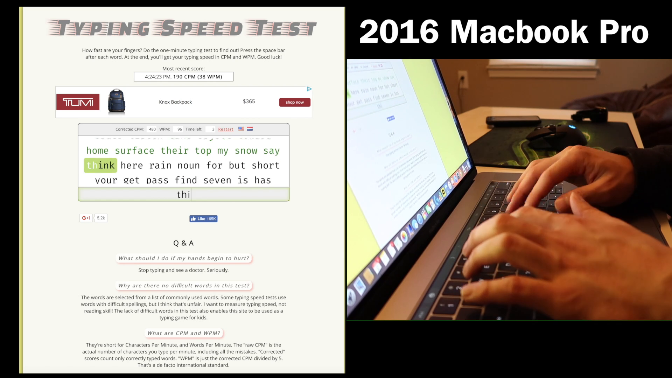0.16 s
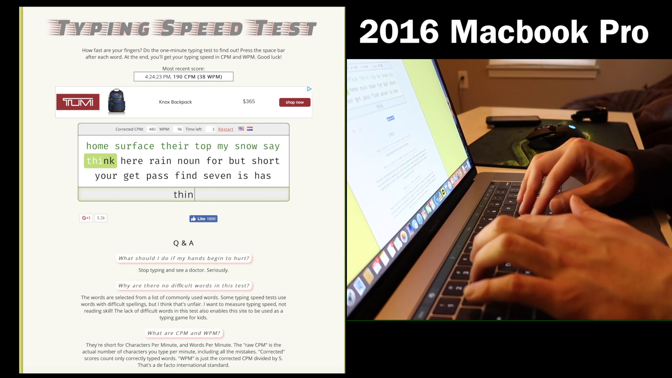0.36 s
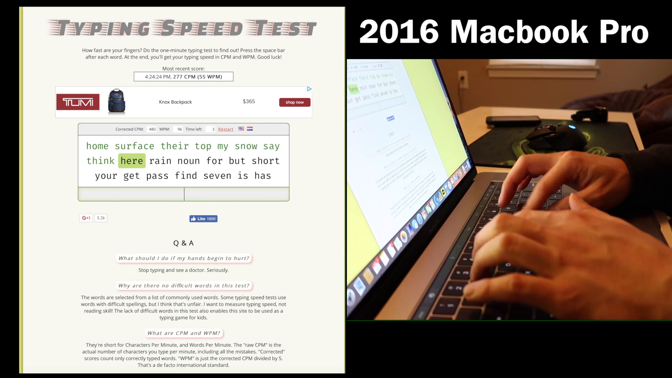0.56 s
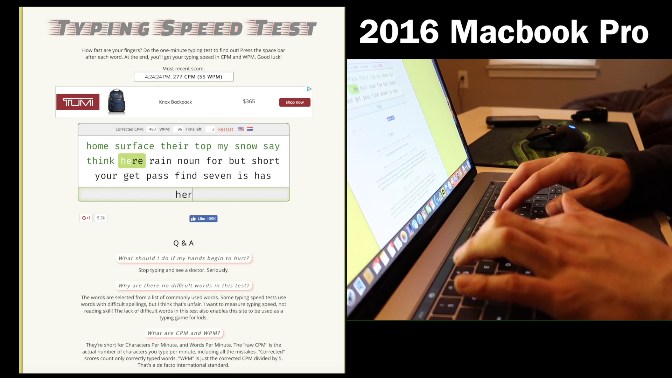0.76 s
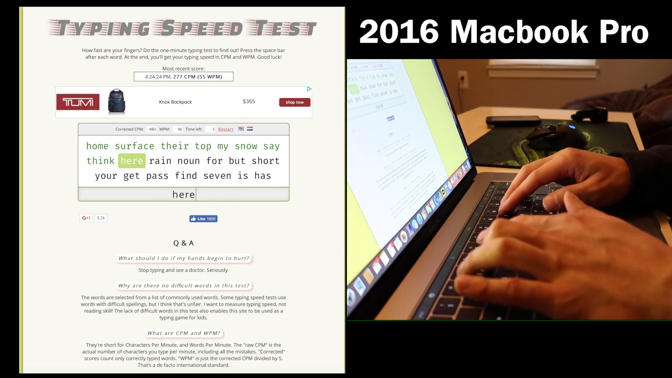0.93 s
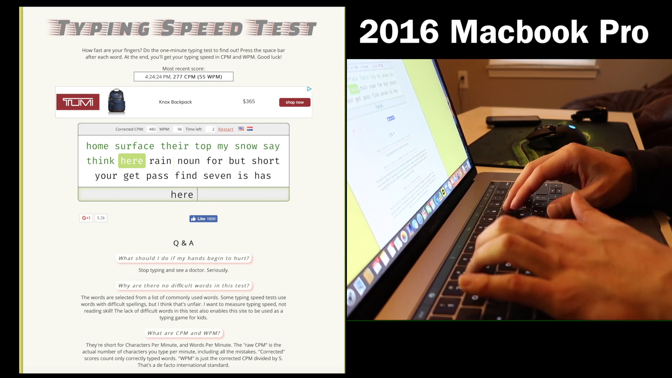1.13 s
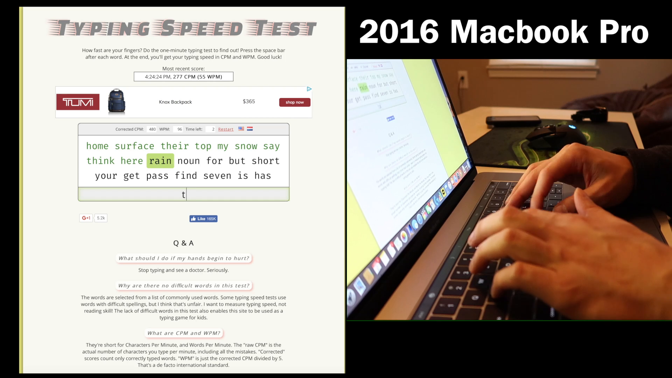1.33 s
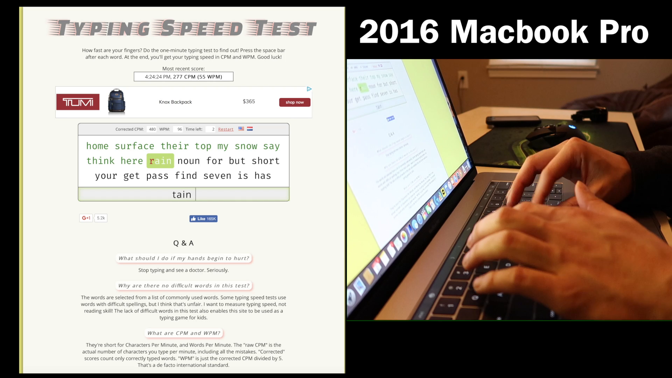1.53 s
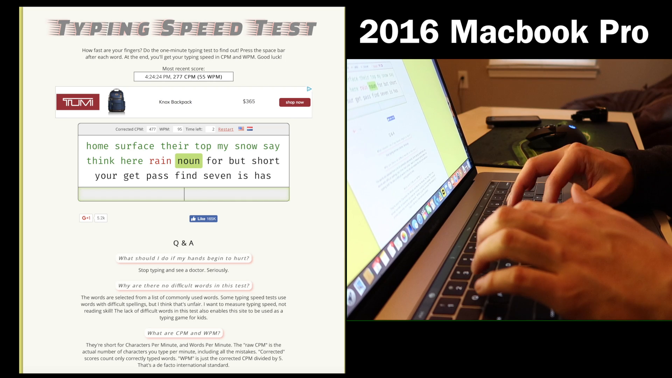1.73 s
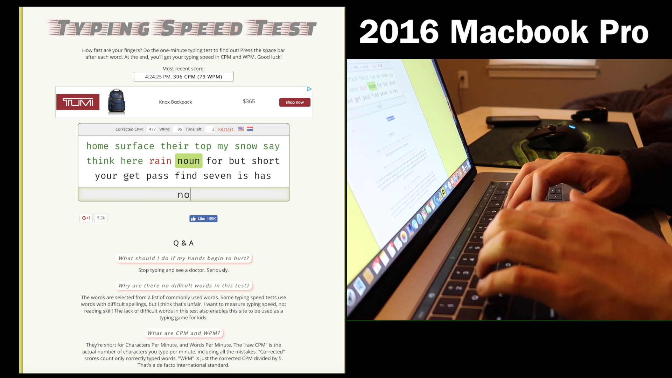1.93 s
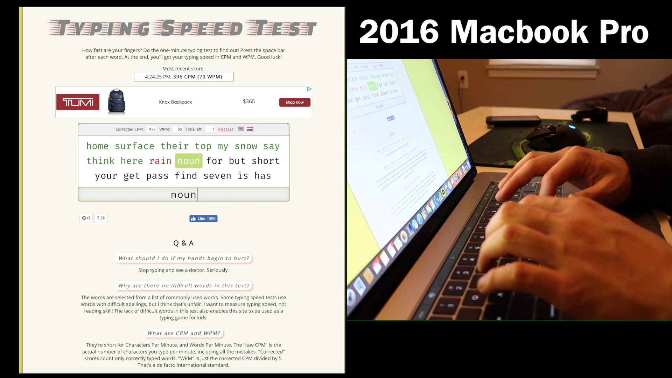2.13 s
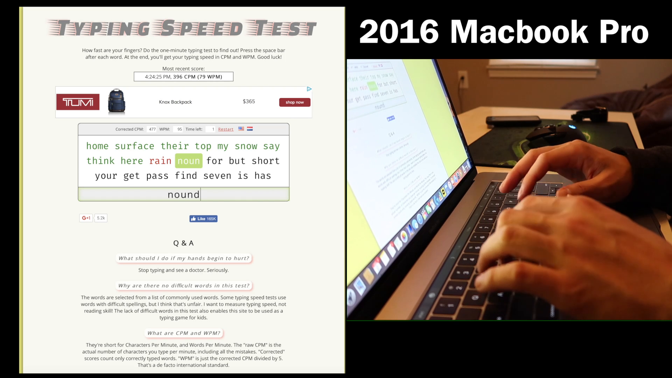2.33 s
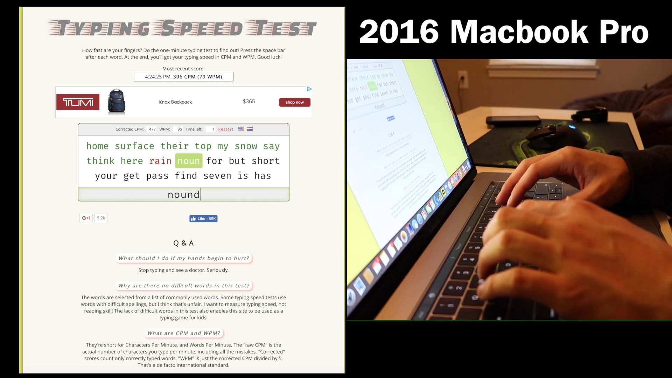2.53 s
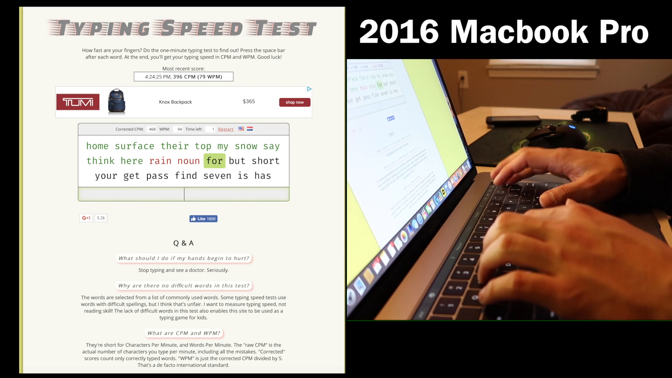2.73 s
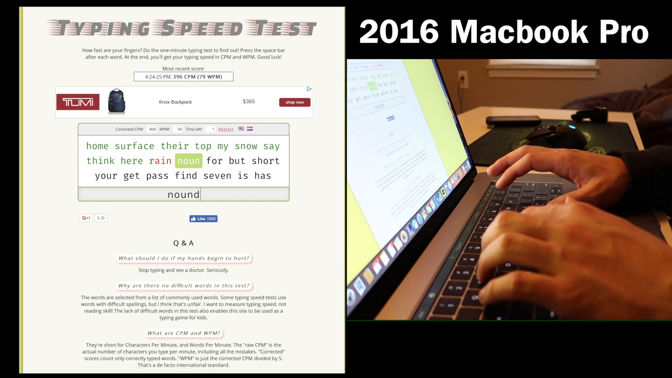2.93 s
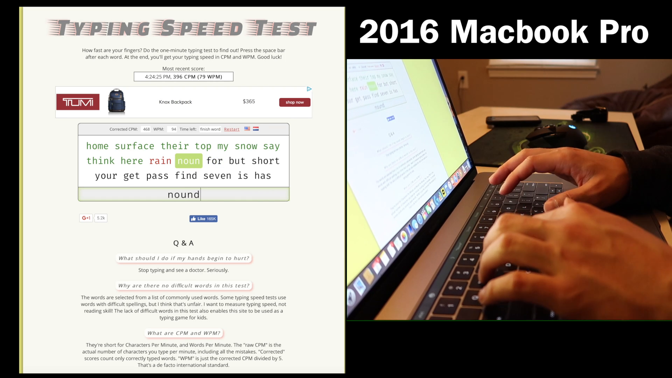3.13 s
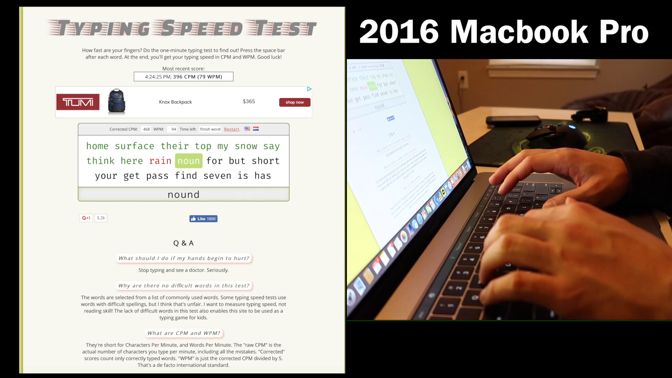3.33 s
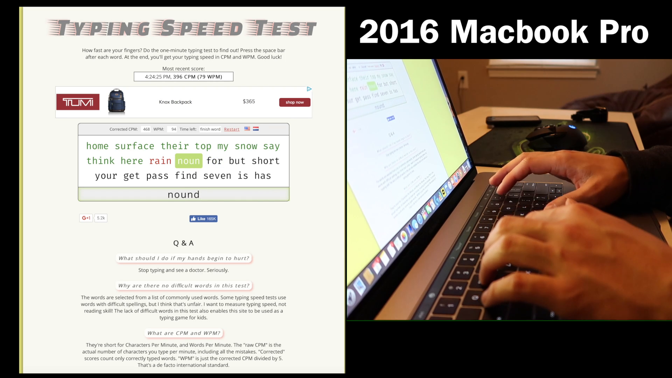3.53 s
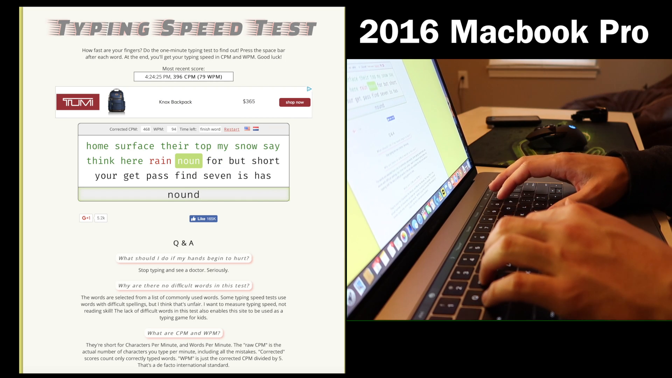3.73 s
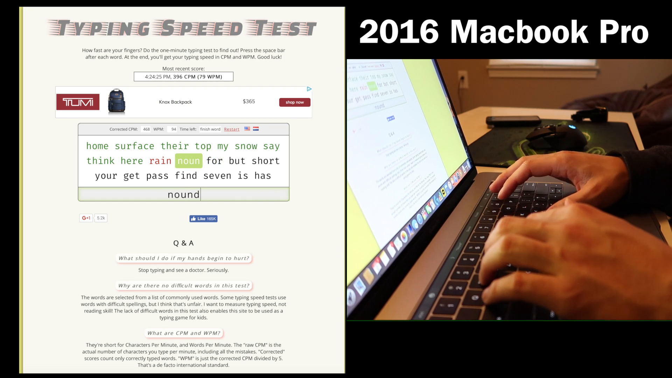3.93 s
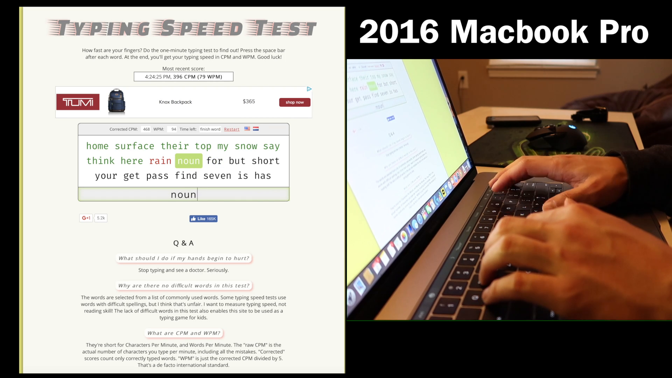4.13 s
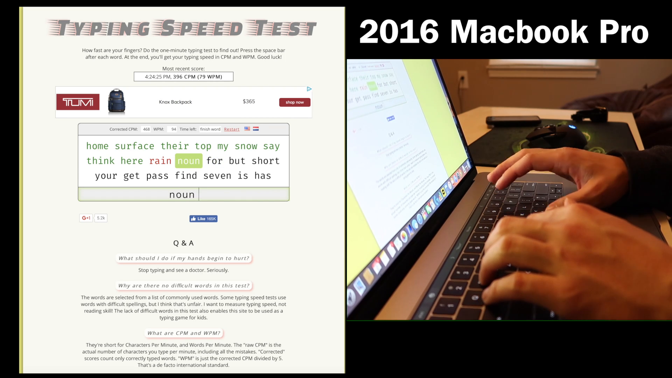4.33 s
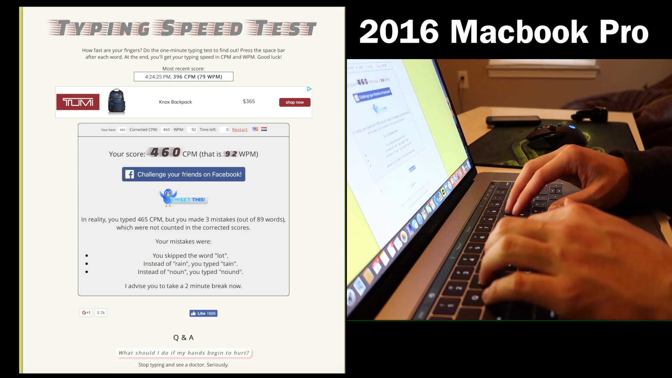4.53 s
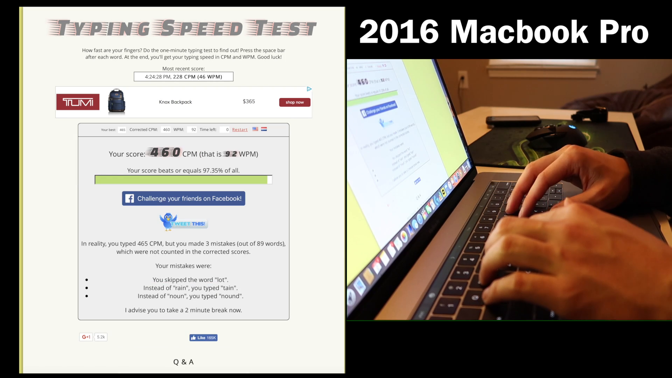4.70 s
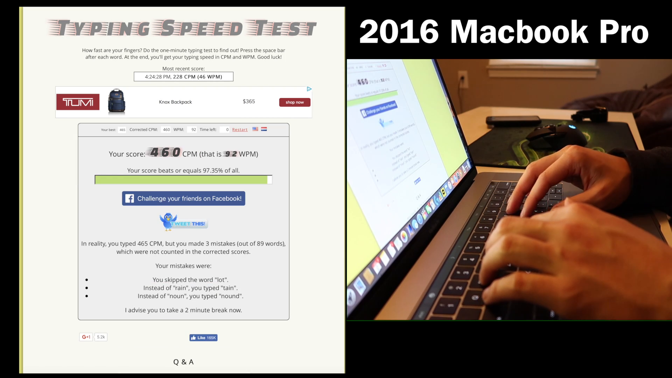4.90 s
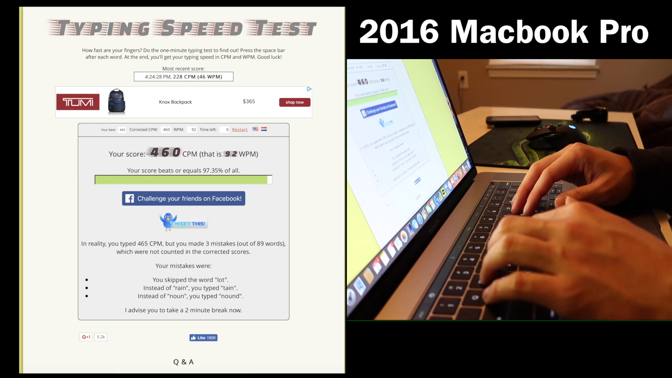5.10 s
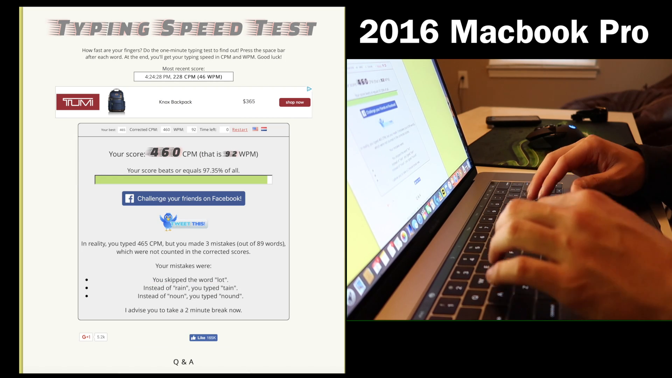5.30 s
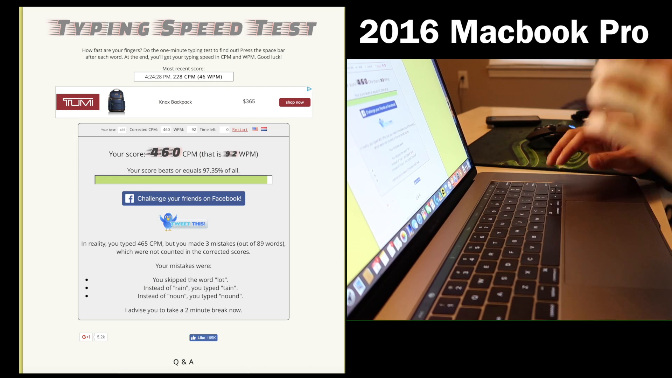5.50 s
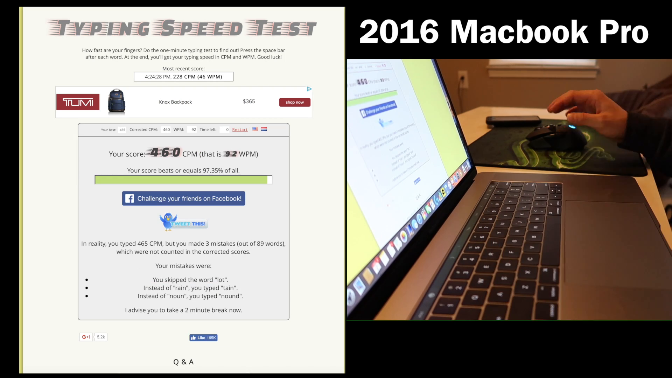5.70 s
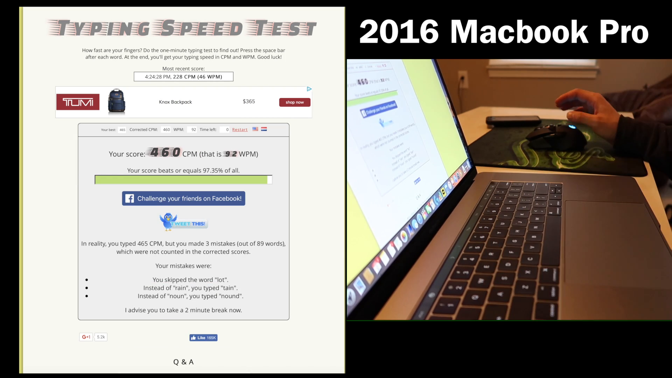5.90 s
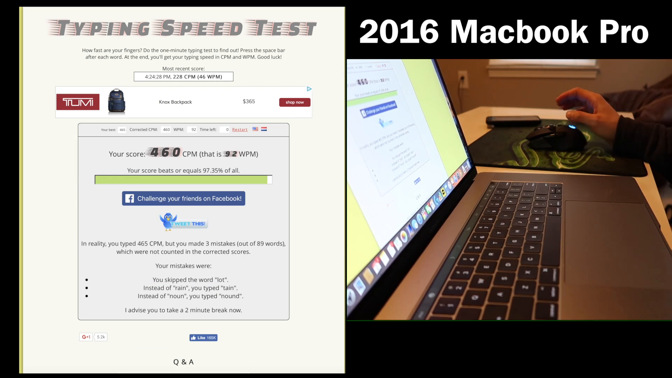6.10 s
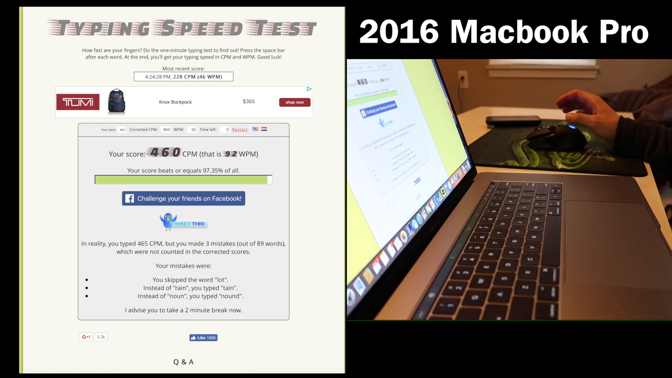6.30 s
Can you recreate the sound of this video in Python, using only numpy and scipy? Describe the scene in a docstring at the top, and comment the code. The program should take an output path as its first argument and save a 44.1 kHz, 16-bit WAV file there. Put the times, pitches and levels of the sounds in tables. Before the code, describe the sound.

From the start a thin laptop is typed on quickly and unevenly, close up in a small, fairly dry room with faint hiss and low hum. Shallow keys give crisp cracks with short metallic ringing and small thumps of case and desk, several per second, mixed with lighter taps. Wide keys clack at about 0.5, 1.1, 1.6, 2.1 and 2.7 seconds, each springing back with a duller thud about a tenth of a second later. The loudest, sharpest stroke comes near 2.4. Typing ends around 3 with tiny taps, leaving quiet background and a barely audible chirp at 3.9. Faint contacts precede one strong wide key at 4.3, released at 4.4. Very light touches follow until 4.9. From 5.2 to 5.6 a soft, grainy skin rub swells and brightens, with a gentle bump at 5.5. Faint chirps near 5.9 and a last soft tap at 6.1 close it.

```python
"""Fast typing on a thin laptop on a desk in a small room, over a faint background of hiss and hum.
Each contact cracks, rings the key plate and thumps case and desk: noise bursts drive banks of decaying modes,
and a short diffuse tail answers. After a pause come one last wide key, down and up, and some light contacts.
Then a hand slides off the palm rest to a mouse: two swelling layers of friction noise, with a soft contact
before they die away. A last soft contact follows near the end."""
import sys
import numpy as np
from scipy import signal
from scipy.fft import rfft, irfft
from scipy.io import wavfile

SR = 44100
rng = np.random.default_rng(int(sys.argv[2]) if len(sys.argv) > 2 else 0)


def store_wav(level_fs):
    """Save 16-bit WAV to argv[1]."""
    pcm = np.round(np.clip(np.atleast_2d(level_fs), -1, 1) * 32767)
    wavfile.write(sys.argv[1], SR, pcm.T.astype(np.int16))


N = 280035   # samples in the scene


def amp(db):
    """Decibel law: a level in dB becomes an amplitude factor."""
    return 10 ** (np.asarray(db) / 20)


def rms_one(x):
    """Power normalisation: scale to an rms of 1."""
    return x / np.sqrt(np.mean(x ** 2) + 1e-30)


def peak_at(db, x):
    """Peak normalisation: scale the largest excursion to a level in dB."""
    return amp(db) * x / np.max(np.abs(x))


def at_hz(points, hz, axis=1):
    """Logarithmic frequency scale: interpolate a table column along log frequency."""
    columns = np.array(points)
    return np.interp(np.log(np.maximum(hz, 1)), np.log(columns[:, 0]), columns[:, axis])


def coloured(x, spectrum):
    """Linear filtering: weight each frequency of a noise by a spectrum."""
    hz = np.fft.rfftfreq(len(x), 1 / SR)
    return irfft(rfft(x) * amp(at_hz(spectrum, hz)), len(x))


def dying(t, t60):
    """Exponential damping: the amplitude falls by 60 dB in t60 seconds."""
    return amp(-60 * t / t60)


def filtered(x, order, hz, kind):
    """Maximally flat filtering: pass one side of a corner, or the band between two."""
    return signal.sosfilt(signal.butter(order, hz, kind, fs=SR, output="sos"), x)


def narrow(hz, width_hz):
    """Resonance: noise passed twice through one damped resonator wavers around its pitch; rms 1."""
    radius = np.exp(-np.pi * width_hz / SR)
    poles = [1, -2 * radius * np.cos(2 * np.pi * hz / SR), radius * radius]
    once = signal.lfilter([1], poles, rng.standard_normal(N + SR))
    twice = signal.lfilter([1], poles, once)
    return rms_one(twice[SR:])   # the first second lets the resonance build up


# Background noise spectrum, relative density: pitch_hz [Hz], level_db [dB per Hz]
FLOOR_SPECTRUM = [(20, -32.5), (40, -15), (60, -3), (100, -3), (140, -8), (290, -13.5), (370, -11.5),
                  (450, -21.5), (620, -29), (950, -20.5), (2000, -28), (5000, -39), (10000, -48),
                  (13500, -56)]
# Background noise level over time: time_s [s], level_db [dB]
FLOOR_LEVEL = [(0, -62), (3.2, -61), (3.5, -64), (3.8, -67.5), (4.1, -67), (4.6, -62), (5.1, -64),
               (5.7, -61.5), (5.95, -61), (6.35, -63)]


def hiss_and_rumble():
    """Noise of fixed colour: hiss and rumble whose level sinks and rises slowly."""
    level_db = np.interp(np.arange(N) / SR, *np.transpose(FLOOR_LEVEL))
    return amp(level_db) * rms_one(coloured(rng.standard_normal(N), FLOOR_SPECTRUM))


# Hum lines: pitch_hz [Hz], level_db [rms dB], width_hz of each resonator pass [Hz]
HUM_LINES = [(352, -71.5, 11), (1262, -90, 12)]


def hum():
    """Narrow-band noise: a small bandwidth makes each hum line waver slowly."""
    return sum(amp(level_db) * narrow(pitch_hz, width_hz) for pitch_hz, level_db, width_hz in HUM_LINES)


# Faint chirps: centre_s [s], pitch_hz [Hz], level_db [dB], length_s between the 1/e points [s]
FAINT_CHIRPS = [(3.907, 3210, -64.5, 0.033), (5.93, 5100, -69.5, .015), (5.961, 2460, -69, 0.038)]


def chirps():
    """Gaussian windowing: smooth short bells of band noise make faint chirps of fixed pitch."""
    t = np.arange(N) / SR
    out = np.zeros(N)
    for centre_s, pitch_hz, level_db, length_s in FAINT_CHIRPS:
        bell = np.exp(-((t - centre_s) / length_s * 2) ** 2)
        out += amp(level_db) * narrow(pitch_hz, 500) * bell
    return out


def background():
    """Superposition: hiss, hum and chirps add as independent pressures."""
    return hiss_and_rumble() + hum() + chirps()


def swell(start_s, attack_s, hold_s, release_s, level_db):
    """Amplitude envelope: attack, hold and release with flanks bent by a power law."""
    t = np.arange(N) / SR - start_s
    remaining = attack_s + hold_s + release_s - t
    ramp = np.clip(np.minimum(t / attack_s, remaining / release_s), 0, 1)
    return amp(level_db) * ramp ** 2.2


# Slow and fast rubbing spectra, relative density: pitch_hz [Hz], level_db [dB per Hz]
SLOW_RUB_SPECTRUM = [(500, -30), (1000, -12.5), (1900, -1), (3500, -2), (5500, -4.5), (8900, -17.5),
                     (11000, -26.5), (16500, -36)]
FAST_RUB_SPECTRUM = [(880, -27), (1500, -2), (2940, -12.5), (6760, 0), (10500, -14), (15100, -14.5),
                     (16000, -21), (16500, -49.5)]
# Hand motion: start_s, attack_s, hold_s, release_s [s], level_db [dB]
SLOW_MOTION = (5.19, .105, .235, .045, -53.5)
FAST_MOTION = (5.22, .27, .045, .11, -51)


def slide():
    """Stick-slip friction: skin on metal makes grainy noise; a brighter layer swells as the hand speeds up."""
    steps = np.repeat(rng.standard_normal(N // 60 + 1), 60)[:N]
    grain = amp(2.5 * steps)   # skin sticks and slips
    out = np.zeros(N)
    for motion, spectrum in [(SLOW_MOTION, SLOW_RUB_SPECTRUM), (FAST_MOTION, FAST_RUB_SPECTRUM)]:
        out += swell(*motion) * rms_one(coloured(grain * rng.standard_normal(N), spectrum))
    return out


# Diffuse tail of the room: pitch_hz [Hz], level_db [dB], t60_s [s]
ROOM_TAIL = [(120.45, -10.5, 0.12), (400, -10, 0.1), (1100, -17.5, 0.27), (3000, -21.5, 0.18),
             (7500, -19, 0.14), (14000, -20, 0.086)]
# Echo of the nearest wall: delay_s [s], level_db [dB]
NEAREST_WALL = (.0125, -23)


def room(x):
    """Reverberation: half-octave noise bands build up and decay, and the nearest wall adds one echo."""
    t = np.arange(SR // 2) / SR
    tail = np.zeros(len(t))
    edges = 60 * 2 ** np.arange(0, 8.2, .5)
    for low, high in zip(edges, edges[1:]):
        band = filtered(rng.standard_normal(len(t)), 2, [low, high], "band")
        centre_hz = np.sqrt(low * high)
        build_up = np.clip(t / 0.0085, 0, 1) ** 2
        shape = dying(t, at_hz(ROOM_TAIL, centre_hz, axis=2)) * build_up
        tail += amp(at_hz(ROOM_TAIL, centre_hz)) * band * shape / np.sqrt(np.sum(shape ** 2))
    delay_s, level_db = NEAREST_WALL
    tail[round(delay_s * SR)] += amp(level_db)
    return signal.fftconvolve(x, tail)[:len(x)]


def rung(modes, near_hz, octaves, far_db, uneven_db, detune, t):
    """Modal superposition: one push rings all modes; those near the favoured pitch stand out."""
    hz, db, t60 = np.transpose(modes)[:, :, None]
    # hands and caps load the metal differently each time
    hz = hz * (1 + detune * rng.standard_normal(hz.shape))
    farness = 1 - np.exp(-(np.log2(hz / near_hz) / octaves) ** 2)
    db = db + far_db * farness + uneven_db * rng.standard_normal(hz.shape)
    sign = rng.choice([-1, 1], hz.shape)
    return np.sum(amp(db) * sign * np.sin(2 * np.pi * hz * t) * dying(t, t60), axis=0)


# Desk top modes: pitch_hz [Hz], level_db [relative dB], t60_s [s]
DESK_MODES = [(80, -3, 0.11), (96.5, -1.5, 0.13)]


def desk_thump(t):
    """Inertia: the heavy desk top is slow to move, so its low modes fade in."""
    return rung(DESK_MODES, 90, 1, 0, 2.0, 0.065, t) * (1 - np.exp(-t / 0.0027))


# Laptop case modes: pitch_hz [Hz], level_db [relative dB], t60_s [s]
CASE_MODES = [(162.3, -7, 0.043), (202.3, -3, .09), (222.2, -3.5, 0.095), (243.6, -3.5, 0.063),
              (286.9, -1, .08), (334.2, -0.5, 0.1), (379.4, 4.5, 0.071), (447, 2, .07), (506, 0.5, 0.068),
              (610, -7.5, 0.031)]


def case_thump(case_hz, rattle, t):
    """Forced vibration: a one-sided shove and the rattle drive the modes of the case."""
    shove = np.abs(rng.standard_normal(len(t))) * dying(t, 0.0056)
    shove += amp(-8.5) * rattle * rng.standard_normal(len(t))
    modes = rung(CASE_MODES, case_hz, 0.54, -10.5, 3.2, 0.027, t)
    case = signal.fftconvolve(modes, shove)[:len(t)]
    return filtered(case, 2, 120, "high")   # too small to radiate deep bass


# Key plate modes: pitch_hz [Hz], level_db [relative dB], t60_s [s]
PLATE_MODES = [(665, -1.5, 0.024), (799, -2.5, 0.028), (907.4, 0.5, 0.031), (968, -4.5, 0.031),
               (1049, -4, .035), (1130, 1.5, 0.029), (1284, -6, 0.044), (1446, 1.5, 0.02),
               (1587, -1, 0.031), (1676, 1.5, 0.023), (1820, 3, 0.019), (1981, 2, 0.027), (2240, 2, 0.02),
               (2566, 0.5, 0.017), (2990, -2, .008), (3450, -3.5, .006), (3980, -2.5, 0.011),
               (4300, -7, 0.0029)]


def plate_ring(modes, contact_s, rattle):
    """Impulse excitation: one sharp blow and its noisy chatter drive the key plate."""
    t = np.arange(len(modes)) / SR
    push = amp(-12) * rng.standard_normal(len(t)) * (dying(t, contact_s) + amp(3) * rattle)
    push[0] = 1   # the sharp blow leads the chatter
    return signal.fftconvolve(modes, push)[:len(t)]


# Crack spectrum below the top treble, relative density: pitch_hz [Hz], level_db [dB per Hz]
CRACK_SPECTRUM = [(1500, -12.5), (3000, 8), (4500, 5), (6500, 1.5), (8500, -2)]


def contact_grit(top_db, t):
    """Broadband impact noise: the crack spectrum with its own top treble for each contact."""
    top = [(10500, top_db + 0.5), (14000, top_db), (16500, top_db - 5)]
    return rms_one(coloured(rng.standard_normal(len(t)), [*CRACK_SPECTRUM, *top]))


def crack(grit, contact_s, rattle, t):
    """Impact and chatter: a burst of contact noise, then a rattle that loses its top first."""
    dull = filtered(grit, 2, 8500, "low")
    chatter = dull + (grit - dull) * dying(t, .28)
    burst = grit * dying(t, contact_s) * (1 - np.exp(-t / 0.00014))
    return burst + amp(3) * chatter * rattle


def loose_rattle(crack_db, t):
    """Repeated impact: uneven small contacts of the loose cap rise and die away."""
    lumps = amp(4.2 * np.repeat(rng.standard_normal(len(t) // 175), 175))
    # softer cracks rattle more for their strength, up to a ceiling
    share_db = min(-34.5 - .38 * crack_db, -21)
    return amp(share_db) * lumps * np.exp(-t / 0.028) * np.clip(t / .009, 0, 1) ** 2


def stroke(plate_db, desk_db, case_db, crack_db, case_hz, plate_hz, touch_db, top_db):
    """Impact sequence: a soft touch, the main blow 3.8 ms later, then the rattle of the loose cap."""
    t = np.arange(SR // 3) / SR
    lead = round(3.8 * SR / 1000)   # samples from touch to blow
    rattle = loose_rattle(crack_db, t)
    contact_s = .005 - 0.00049 * plate_db   # soft blows smear out
    modes = rung(PLATE_MODES, plate_hz, 0.22, -8.5, 1.5, .02, t)
    grit = contact_grit(top_db, t)

    blow = peak_at(plate_db, plate_ring(modes, contact_s, rattle))
    blow += peak_at(crack_db, crack(grit, contact_s, rattle, t))
    blow += peak_at(case_db, case_thump(case_hz, rattle, t))
    blow += peak_at(desk_db, desk_thump(t))

    scuff = dying(t, 0.016) * (1 - np.exp(-t / 0.0004))   # skin meets the cap gently
    scuffed_plate = signal.fftconvolve(modes, rng.standard_normal(len(t)) * scuff)[:len(t)]
    touch = peak_at(plate_db - 4.5, scuffed_plate) + peak_at(crack_db, grit[::-1] * scuff)

    out = np.concatenate([np.zeros(lead), blow])
    out[:len(t)] += amp(touch_db) * touch
    return out, lead


# Single strokes: keys, one early key release and lighter hand contacts:
# start_s of the blow [s], plate_db, desk_db, case_db, crack_db [peak dB],
# case_hz, plate_hz favoured [Hz], touch_db [dB on plate and crack], top_db of the treble [dB per Hz]
SINGLE_STROKES = [(-0.02, -24, -43, -22.5, -29, 212, 1603, -46, -20),
                  (0.081, -10.5, -34.5, -27.5, -19.5, 288, 900, -14, -10.5),
                  (0.162, -19.5, -34, -26, -32.5, 398, 890, -4, -5.5),
                  (0.196, -30, -59, -27, -38, 262, 1550, -32, -18),
                  (0.2281, -19, -36, -31, -26, 333, 930, -16, -7.5),
                  (0.2513, -21, -42, -27, -32.5, 400, 909, -21.5, -19),
                  (0.3384, -25.5, -63, -28, -42, 419, 1870, -10, -22),
                  (0.3522, -24, -45.5, -26.5, -30.5, 213, 1050, -17, -15.5),
                  (0.4441, -14.5, -43.5, -30, -28, 400, 1130, -15, -9),
                  (0.4757, -22.5, -50.5, -35.5, -33.5, 349, 1098, -19, -10),
                  (0.5212, -31, -79, -45.5, -32.5, 172, 1012, -19, -26),
                  (0.5805, -29.5, -50, -41.5, -45, 188, 1850, -9.5, -5),
                  (0.6395, -39, -66, -70, -38, 409, 1600, -24, -27),
                  (0.7102, -12, -32.5, -22, -22.5, 382, 890, -9, -7),
                  (0.7437, -10.5, -34, -28.5, -14.5, 266, 2160, -30, -11),
                  (0.8027, -25, -59.5, -30.5, -40.5, 250, 900, -20, -18),
                  (0.8253, -10, -30, -26.5, -17.5, 280, 970, -13.5, -18),
                  (0.8555, -30, -37.5, -29, -36.5, 253, 925, -3.5, -11),
                  (0.9418, -10, -26.5, -26, -10.5, 253, 2260, -19.5, -6),
                  (1.073, -27, -58.5, -32, -27, 260, 970, -28, -6),
                  (1.2822, -8.5, -26.5, -26.5, -21, 350, 1370, -11, -10),
                  (1.3791, -27, -70, -41, -27, 172, 1530, -34, -6),
                  (1.3921, -16, -43, -30.5, -22, 253, 1302, -38, -11),
                  (1.4088, -30, -40.5, -26.5, -42, 228, 1560, -18, -5),
                  (1.4451, -33, -58, -34.5, -36, 392, 1110, -17, -14),
                  (1.4975, -20, -33, -17, -22, 355, 1950, -24, -4),
                  (1.5204, -26, -49, -32, -29.5, 172, 1030, -2, -6),
                  (1.607, -24.5, -56, -53, -32.5, 212, 1890, -16, -7),
                  (1.6434, -34, -63, -30, -47, 230, 1680, -8, -18),
                  (1.8546, -16, -31, -14, -18.5, 380, 1092, -26, -5),
                  (1.9381, -26, -43, -32, -35.5, 432, 784, -7, -13),
                  (2.014, -32, -65, -54.5, -39, 280, 1620, -25, -12),
                  (2.0207, -24.5, -39, -24, -45, 383, 1080, -3, -11),
                  (2.0971, -24, -56, -39.5, -31.5, 351, 1670, -32, -11),
                  (2.165, -25, -50, -26.5, -37, 392, 1787, -23, -1),
                  (2.3645, -3, -16, -5.5, -1, 292, 1174, -28, -8.5),
                  (2.438, -27, -54, -30.5, -37, 269, 750, -21.5, -15),
                  (2.581, -42.5, -54, -57.5, -36.5, 349, 3095, -12, -22),
                  (2.8712, -8, -35, -24.5, -12, 171, 1200, -26, -10.5),
                  (2.981, -24.5, -77, -42, -27.5, 345, 998, -22, -18),
                  (3.164, -45, -61, -55, -59, 171, 2596, -22.5, -12),
                  (3.181, -39.5, -46.5, -52, -35, 258, 999, -18, -30),
                  (4.1695, -50.5, -74, -66, -55.5, 263, 2130, -22, -22),
                  (4.1839, -44, -51, -40.5, -69, 213, 952, -29.5, -14),
                  (4.2895, -37.5, -57.5, -45, -37.5, 184, 2170, -9, -24),
                  (4.6324, -39.5, -58.5, -56, -38, 245.6, 2158, -7.5, -26),
                  (4.6722, -48.5, -58.5, -74, -70, 360, 1920, -4, -15),
                  (4.8898, -54, -57.5, -64, -50.5, 349, 2136, -8, -20),
                  (5.5151, -39.5, -49.5, -36.5, -42, 243, 1150, 0, -7),
                  (6.1043, -34, -58, -44.5, -30, 255, 1012, -8, -24.5)]
# Wide keys: down_s [s], plate_db, case_db [peak dB], plate_hz favoured [Hz],
# up_s [s], up_case_db, up_crack_db [peak dB], up_top_db of the treble [dB per Hz]
WIDE_KEY_STROKES = [(0.5389, -11.5, -13.5, 2570, 0.6476, -25, -29.5, -34),
                    (1.1087, -1.5, -12, 1970, 1.2305, -22, -33, -47),
                    (1.58, -16.5, -15, 2760, 1.6911, -23, -26, -21),
                    (2.1198, -28, -29, 2090, 2.2493, -28.5, -45.5, -16),
                    (2.678, -13, -15, 2400, 2.7828, -20.5, -25, -17),
                    (4.3119, -5.5, -13.5, 2010, 4.4416, -22, -26, -21)]


def contacts():
    """Press and release: wide keys go down with a clack and spring back with a dull thud."""
    rows = list(SINGLE_STROKES)
    for down_s, plate_db, case_db, plate_hz, up_s, up_db, crack_db, top_db in WIDE_KEY_STROKES:
        # same columns as the single strokes
        rows.append((down_s, plate_db, -32, case_db, plate_db - 1.5, 228, plate_hz, -18, -13.5))
        rows.append((up_s, up_db - 4, up_db - 17, up_db, crack_db, 211, 900, -15, top_db))
    return rows


def typing():
    """Linear superposition: overlapping contacts add, after one second of lead-in."""
    out = np.zeros(N + 2 * SR)
    for start_s, *settings in contacts():
        sound, lead = stroke(*settings)
        at = SR + round(start_s * SR) - lead
        out[at:at + len(sound)] += sound
    return out


def scene():
    """Superposition: keys with their room tail, the sliding hand and the background."""
    keys = typing()
    keys_in_room = (keys + room(keys))[SR:SR + N]   # drop the lead-in
    return (keys_in_room + slide() + background())[None]


def record(dry):
    """Band limiting and saturation: the microphone drops deep bass, peaks are rounded, the top is cut."""
    dry = filtered(dry, 2, 55, "high")
    rounded = dry / (1 + (dry / .86) ** 6) ** (1 / 6)
    # 70 dB down from 17 kHz upwards
    return signal.sosfilt(signal.cheby2(12, 70, 17000, fs=SR, output="sos"), rounded)


dry = scene()
out = record(dry)
store_wav(out)
```